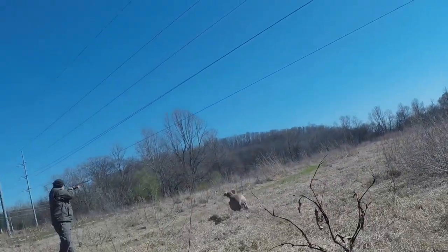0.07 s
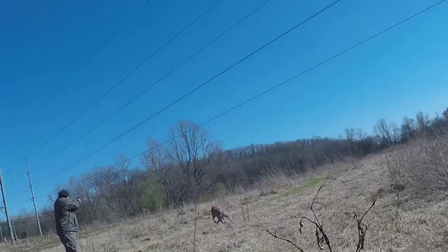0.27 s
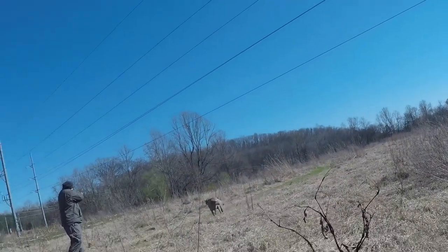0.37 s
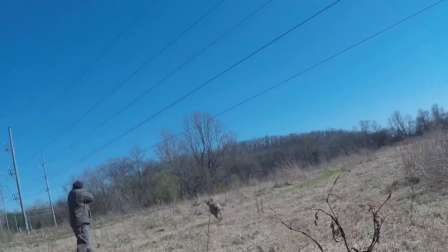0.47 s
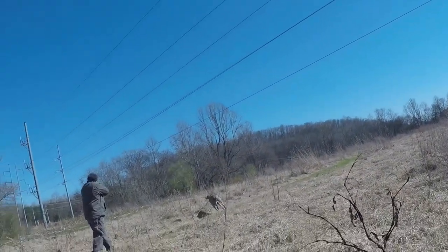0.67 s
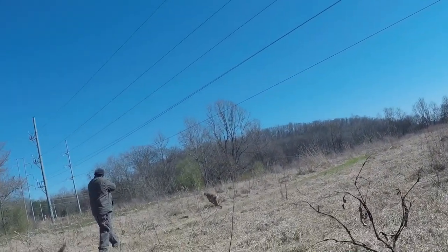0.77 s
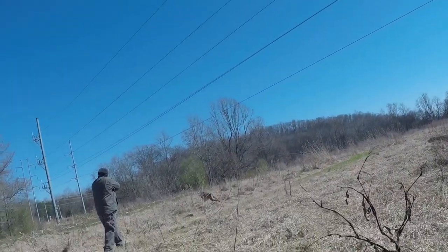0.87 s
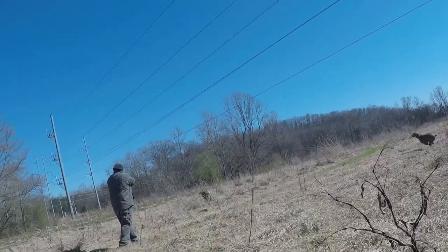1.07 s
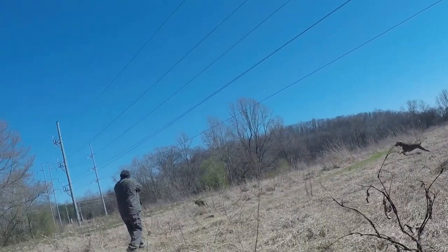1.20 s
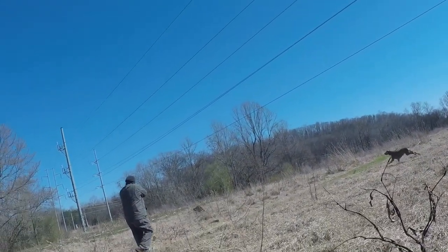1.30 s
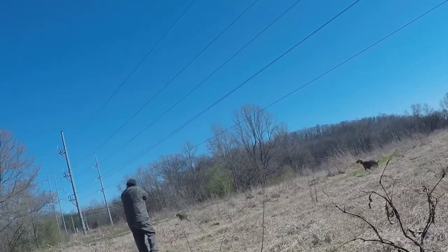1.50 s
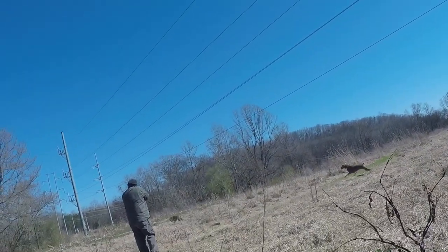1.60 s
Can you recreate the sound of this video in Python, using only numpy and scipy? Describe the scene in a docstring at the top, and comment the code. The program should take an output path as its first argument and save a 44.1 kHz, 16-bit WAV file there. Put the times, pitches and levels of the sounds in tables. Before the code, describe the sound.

A gun fires twice nearby outdoors, each sharp crack followed by a rolling echo.

```python
"""Two gun shots a few metres away in a dry, open field, heard by a small camera in a ringing housing.
Wind rumbles on the microphone over a quiet hiss and a brief rustle of grass. Each shot then cracks,
overloads the microphone, thumps, sprays off the brush and rolls back from the wooded hillside.
As the second roll fades, the gun clacks faintly in the hands."""
import sys
import numpy as np
from scipy import signal
from scipy.fft import rfft, irfft
from scipy.io import wavfile

SR = 44100
rng = np.random.default_rng(int(sys.argv[2]) if len(sys.argv) > 2 else 0)


def inscribe(sig):
    """Save sig as 16-bit PCM at rate SR to the path in sys.argv[1].

    A 1-D sig is mono; a 2-D sig holds one channel per row.
    Samples are clipped to [-1, 1] before scaling.
    """
    pcm = np.round(np.clip(np.atleast_2d(sig).T, -1, 1) * 32767)
    wavfile.write(sys.argv[1], SR, pcm.astype(np.int16))


N = 72765
T = np.arange(N) / SR

# The two shots. Each row: start in seconds, blast level in dB, blast length in seconds, ground bounce
# delay in seconds, then the levels of thump, brush scatter and far echo in dB.
SHOTS = [(.1844, 9, .00011, .0029, -14.5, -30, -44), (0.6723, 9.5, .00013, .0018, -14.5, -25.5, -44)]


def from_db(db):
    """Decibels to gain."""
    return 10 ** (np.asarray(db) / 20)


def noise(colour):
    """Noise of rms 1, its tone shaped by points of frequency in Hz and relative level in dB."""
    hz, db = np.transpose(colour)
    freqs = np.maximum(np.fft.rfftfreq(N, 1 / SR), 1)
    gain = from_db(np.interp(np.log(freqs), np.log(hz), db))
    x = irfft(rfft(rng.standard_normal(N)) * gain, N)
    return x / x.std()


def flicker(rate_hz, depth_db):
    """A randomly wavering gain of rms 1 that adds grain."""
    wobble = signal.sosfilt(signal.butter(2, rate_hz, fs=SR, output="sos"), rng.standard_normal(N))
    gain = from_db(depth_db * np.clip(wobble / wobble.std(), -2, 2))
    return gain / np.sqrt(np.mean(gain ** 2))


def swell(start, rise, decay):
    """An envelope with a straight attack and an exponential tail; times in seconds."""
    age = T - start
    return np.clip(age / rise, 0, 1) * np.exp(-np.maximum(age - rise, 0) / decay)


def dull(x, edge_hz):
    """Rolls off the treble gently."""
    return signal.sosfilt(signal.butter(1, edge_hz, fs=SR, output="sos"), x + 1e-18)


def resonate(x, peaks):
    """A chain of bell filters, one for each resonance or dip."""
    for hz, db, q in peaks:
        w, g = 2 * np.pi * hz / SR, from_db(db / 2)
        a = np.sin(w) / (2 * q)
        feedforward = [1 + a * g, -2 * np.cos(w), 1 - a * g]
        feedback = [1 + a / g, -2 * np.cos(w), 1 - a / g]
        x = signal.lfilter(feedforward, feedback, x + 1e-18)
    return x


def shock(start, length):
    """A pressure jump that falls through zero into suction."""
    age = (np.arange(N) - round(start * SR)) / SR / length
    return (age >= 0) * (1 - age) * np.exp(-np.abs(age))


def field():
    """The bed: wind buffets the microphone and dry grass rustles over a far hiss."""
    # Tones of rumble, rustle and hiss. Each row: frequency in Hz, relative level in dB.
    wind_colour = [(12, -6.5), (22, -3.5), (38, -1), (55, -13.5), (80, -29), (150, -39.5), (300, -50),
                   (900, -79.5)]
    grass_colour = [(500, -25.5), (2000, -10), (3900, 11), (6000, -2.5), (9000, -5), (15000, -7.5)]
    air_colour = [(100, 10), (400, -2.5), (1000, -1.5), (1350, -5.5), (1750, 0), (2500, -7), (4000, -11),
                  (7000, -15.5), (15000, -20)]
    # Fader moves for wind and grass. Each row: time in seconds, gain in dB.
    gusts = [(0, 6.5), (.1, 7.5), (.3, 4.5), (.52, 1), (.75, -1), (1.0, -4), (1.2, -0.5), (1.65, -1.5)]
    grass_fade = [(0, -61), (.09, -59), (.17, -68.5), (.6, -81), (1.65, -87.5)]
    wind = from_db(-42.5 + np.interp(T, *np.transpose(gusts))) * noise(wind_colour)
    grass_level = from_db(np.interp(T, *np.transpose(grass_fade)))
    grass = grass_level * noise(grass_colour) * flicker(rate_hz=120, depth_db=0.85)
    return wind + grass + from_db(-61.5) * noise(air_colour)


def blasts():
    """A faint rush of noise swells just before each muzzle blast, its ground bounce and its gas."""
    # Tone of the gas. Each row: frequency in Hz, relative level in dB.
    gas_colour = [(100, -11), (350, -9.5), (800, 2), (1400, -1.5), (2300, 4.5), (3600, -1), (5200, 1),
                  (8000, -2.5), (15000, -14)]
    # Peaks and a dip that voice the blast. Each row: centre in Hz, gain in dB, Q.
    blast_peaks = [(328, -4.5, 2), (900, 5, 1.2), (3540, 5.5, 2.5)]
    ground_db, gas_db = -8.5, -14.5   # relative to the blast
    out = np.zeros(N)
    for start, db, length, bounce_delay, *_ in SHOTS:
        hiss = noise(gas_colour)
        faint_rush = from_db(-22) * hiss * swell(start - .003, rise=.002, decay=.0036)
        bounce = from_db(ground_db) * shock(start + bounce_delay, length)
        gas = from_db(gas_db) * hiss * swell(start, rise=.0005, decay=.0018)
        out += faint_rush + from_db(db) * (shock(start, length) + bounce + gas)
    return resonate(out, blast_peaks)


def thumps():
    """The low punch: suction behind each blast, and the slower recovery from it."""
    lag_s, width_s, recovery_s = .0044, .0015, .0043
    out = np.zeros(N)
    for start, *_, thump_db, _, _ in SHOTS:
        suction = np.exp(-((T - start - lag_s) / width_s) ** 2)
        recovery = .22 * swell(start + lag_s, recovery_s, recovery_s)
        out += from_db(thump_db) * (recovery - suction)
    return out


def brush():
    """Grass, twigs and posts nearby throw back a grainy spray of small reflections; the lows linger."""
    # Tones of the spray and its low body. Each row: frequency in Hz, relative level in dB.
    spray_colour = [(60, -18.5), (170, 2.5), (400, -3.5), (900, 1.5), (2000, 4), (4000, -1.5), (8000, -2.5),
                    (15000, -13)]
    body_colour = [(80, 0.5), (200, -3), (420, 1.5), (900, -2.5), (1500, -13.5), (4000, -35.5)]
    # Single reflections off things nearby. Each row: start in seconds, level in dB.
    reflections = [(.2065, -32), (0.6904, -23), (0.7008, -35), (0.7047, -34.5), (0.7203, -37)]
    spray_level, body_level = np.zeros((2, N))
    for start, *_, scatter_db, _ in SHOTS:
        spray_level += from_db(scatter_db) * swell(start, rise=.0013, decay=.024)
        body_level += from_db(scatter_db - 11.5) * swell(start, rise=.012, decay=.04)
    singles_level = sum(from_db(db) * swell(start, rise=.00084, decay=.0033) for start, db in reflections)
    spray = noise(spray_colour) * spray_level * flicker(rate_hz=430, depth_db=2.5)
    return spray + noise(spray_colour) * singles_level + noise(body_colour) * body_level


def stalk_fizz():
    """Dry stalks and poles throw the shots back as a bright fizz and thin ticks."""
    # Each row: start in seconds, level in dB, rise and decay in seconds.
    bursts = [(0.201, -44, 0.006, 0.061), (0.295, -50, 0.0018, .005), (0.3, -44, 0.0007, 0.0078),
              (.70, -50, 0.012, 0.037), (0.7656, -52, 0.0012, 0.0021), (0.784, -48.5, 0.00054, 0.0036)]
    # Tone of the fizz. Each row: frequency in Hz, relative level in dB.
    fizz_colour = [(300, -12), (1000, -9), (2000, -6), (3300, 0.5), (8000, -5), (15000, -9.5)]
    level = sum(from_db(db) * swell(start, rise, decay) for start, db, rise, decay in bursts)
    return noise(fizz_colour) * level * flicker(rate_hz=320, depth_db=4.0)


def hillside_roll(colour):
    """Each shot rolls back in waves, duller from farther away."""
    # Echoes off the slope and tree lines. Each row: delay after the shot in seconds, relative level
    # in dB, rise and decay in seconds, treble edge in Hz.
    waves = [(.07, -14.5, 0.044, 0.26, 9000), (0.203, -1, .045, 0.078, 4000), (.36, -4, .03, 0.072, 2185),
             (0.562, -15.5, 0.042, 0.51, 2000)]
    out = np.zeros(N)
    for delay, db, rise, decay, edge_hz in waves:
        level = sum(from_db(db + far_db) * swell(start + delay, rise, decay)
                    for start, *_, far_db in SHOTS)
        out += dull(noise(colour) * level * flicker(rate_hz=660, depth_db=3.5), edge_hz)
    return from_db(-3.5) * out


def trunk_slaps(colour):
    """Single trunks and banks answer with short slaps that stand out of the roll."""
    # Each row: start in seconds, level in dB, decay in seconds, treble edge in Hz.
    slaps = [(.336, -49.5, 0.018, 4000), (.362, -46.5, 0.0047, 5040), (0.39, -44, 0.009, 6000),
             (0.415, -41, 0.0072, 5070), (0.45, -46, 0.02, 3500), (.578, -51, .008, 5000),
             (0.887, -47, 0.01, 7000), (.920, -42, 0.015, 3500), (.965, -45, 0.0084, 4500),
             (1.055, -50.5, 0.0043, 4010), (1.105, -53, 0.053, 2500)]
    spray = noise(colour)
    return sum(dull(from_db(db) * spray * swell(start, .00093, decay), edge_hz)
               for start, db, decay, edge_hz in slaps)


def gun_clacks():
    """The gun's parts meet in short, gritty contacts as it is handled."""
    # Each row: start in seconds, level in dB, decay in seconds, treble edge in Hz.
    contacts = [(1.265, -45, 0.013, 1100), (1.3205, -43, .006, 5100), (1.367, -46.5, 0.0042, 2990),
                (1.374, -33, 0.0039, 13200), (1.3821, -37, 0.0042, 9000), (1.394, -45.5, 0.022, 1200),
                (1.479, -51, 0.0081, 1513), (1.491, -46.5, 0.0042, 1756), (1.539, -55, 0.022, 1503)]
    # Tone of a clack. Each row: frequency in Hz, relative level in dB.
    clack_colour = [(100, 8.5), (350, -10.5), (750, 8.5), (1300, 5.5), (2200, 5), (4000, -2), (8000, 2.5),
                    (15000, -2.5)]
    grit = noise(clack_colour) * flicker(rate_hz=1180, depth_db=2.5)
    return sum(dull(from_db(db) * grit * swell(start, .00042, decay), edge_hz)
               for start, db, decay, edge_hz in contacts)


def scene():
    """The mono mix: gun and echoes ring the housing; the thumps and the bed go in straight."""
    # Tone shared by the roll and the slaps. Each row: frequency in Hz, relative level in dB.
    echo_colour = [(60, -7), (170, 3.5), (400, -3), (800, 0.5), (1300, 3.5), (2000, 3), (4000, -4),
                   (8000, -11), (15000, -16)]
    # Resonances and dips of the camera housing. Each row: centre in Hz, gain in dB, Q.
    housing = [(1345, -6, 5.1), (1704, 10, 4), (2010, 8, 5.2), (2886, 4.5, 3.4), (3451, 10, 12),
               (3809, 11, 12), (4854, 9, 6), (5900, -2.5, 22), (6610, 5.5, 8), (10500, 6, 8.6)]
    near = blasts() + brush() + stalk_fizz()
    far = hillside_roll(echo_colour) + trunk_slaps(echo_colour)
    ringing = resonate(near + far + gun_clacks(), housing)
    return (ringing + thumps() + field())[None]


def record(dry):
    """The blasts drive the input into soft clipping; a steep filter then cuts the top."""
    ceiling, cutoff_hz = .9, 15200
    clipped = dry / (1 + (dry / ceiling) ** 4) ** (1 / 4)
    return signal.sosfilt(signal.ellip(10, .1, 70, cutoff_hz, fs=SR, output="sos"), clipped)


dry = scene()
out = record(dry)
inscribe(out)
```